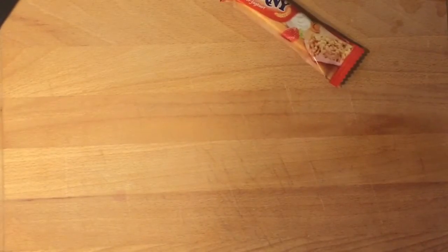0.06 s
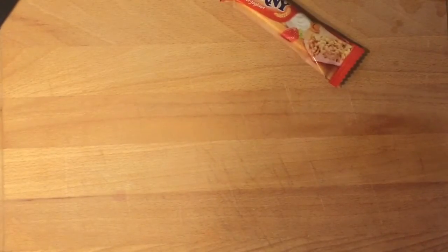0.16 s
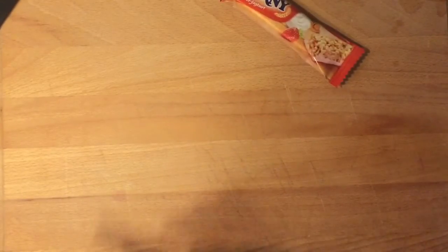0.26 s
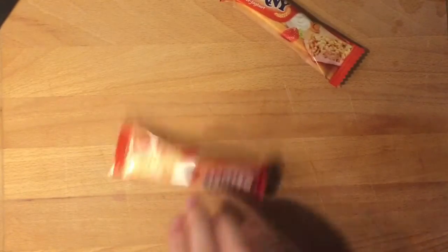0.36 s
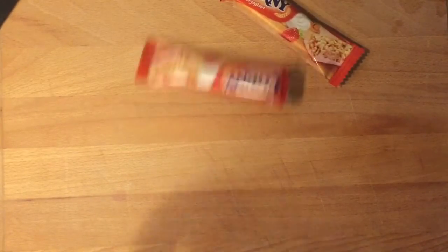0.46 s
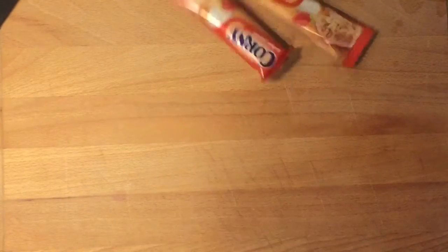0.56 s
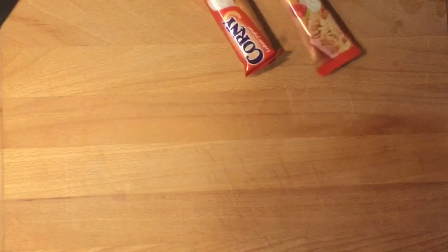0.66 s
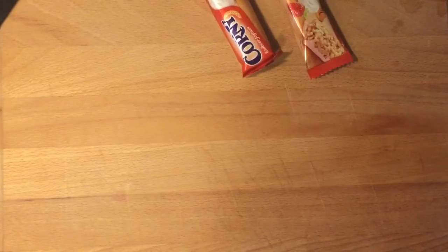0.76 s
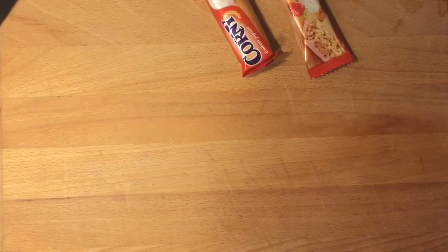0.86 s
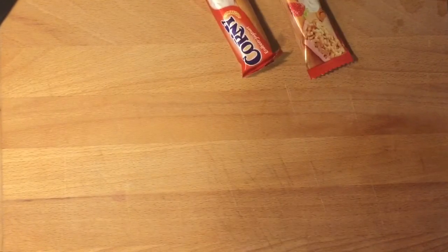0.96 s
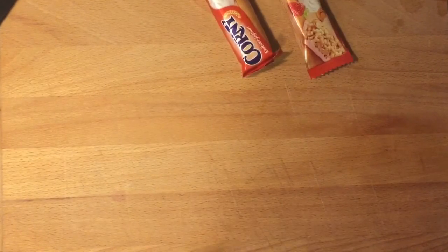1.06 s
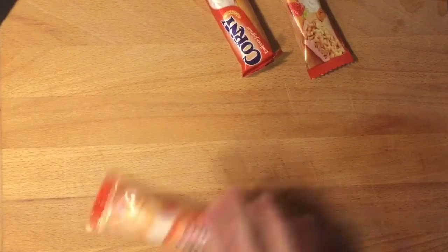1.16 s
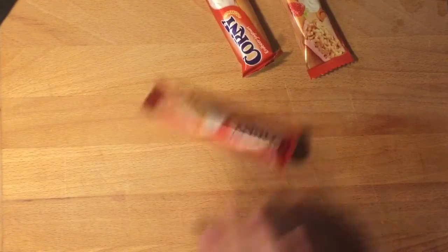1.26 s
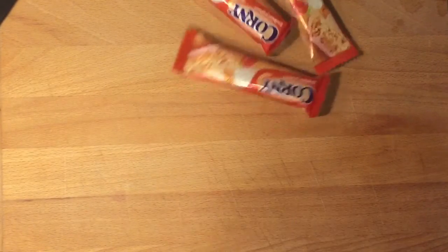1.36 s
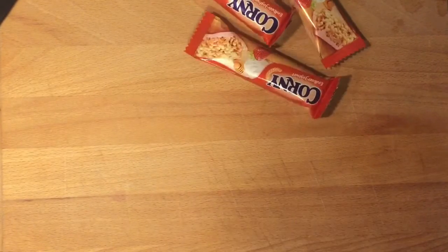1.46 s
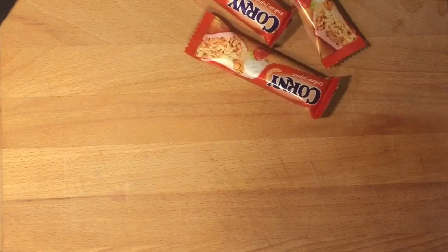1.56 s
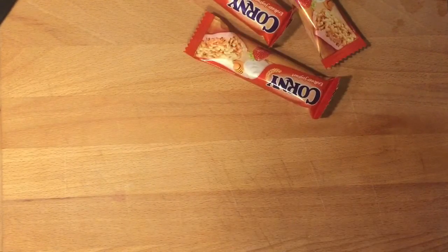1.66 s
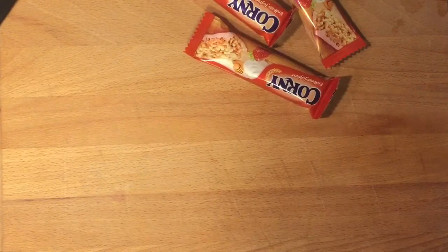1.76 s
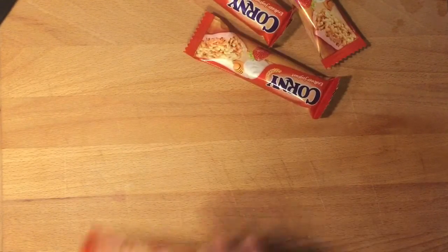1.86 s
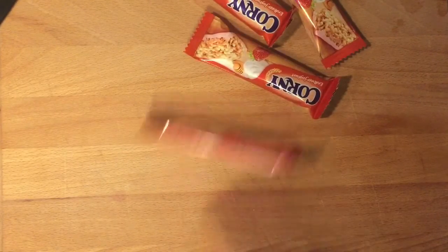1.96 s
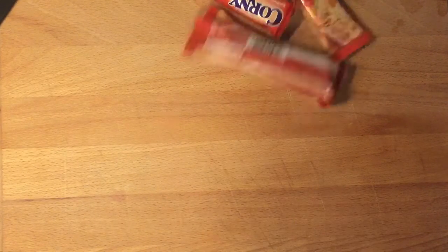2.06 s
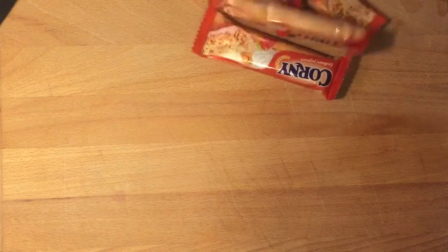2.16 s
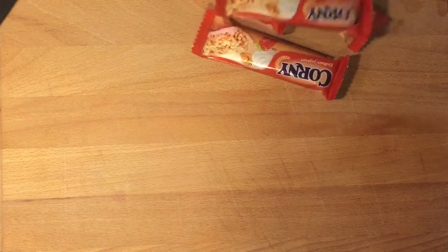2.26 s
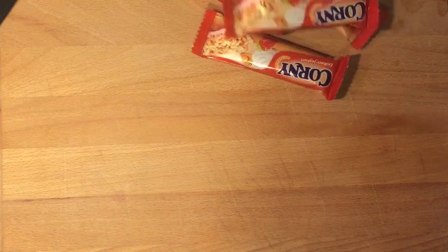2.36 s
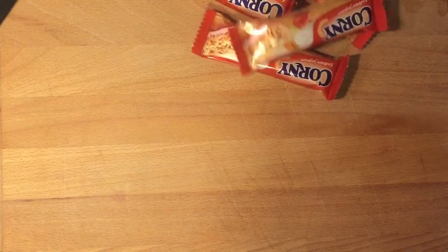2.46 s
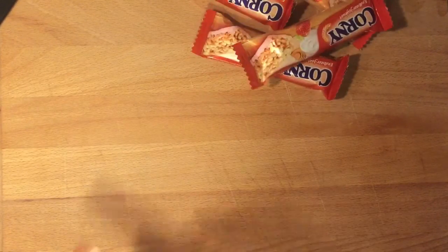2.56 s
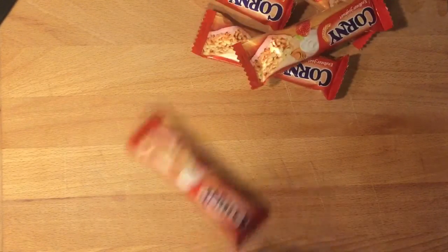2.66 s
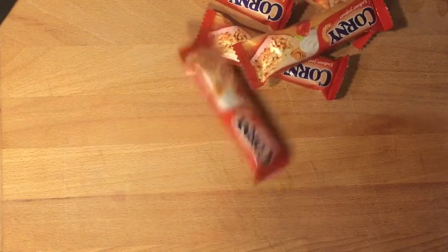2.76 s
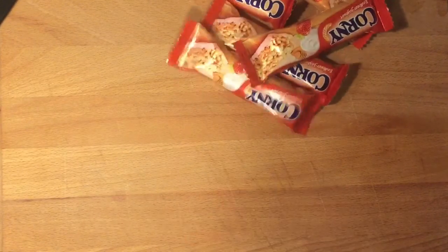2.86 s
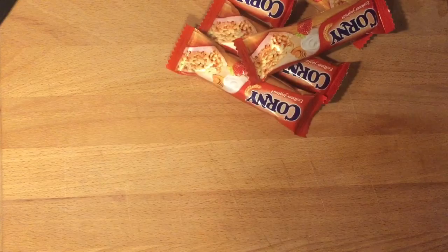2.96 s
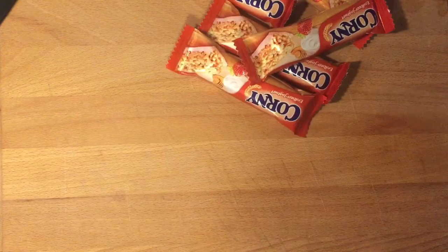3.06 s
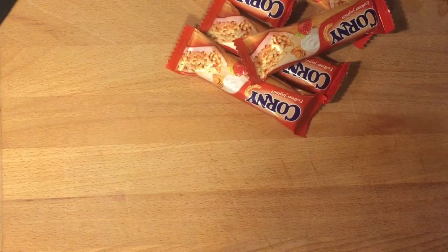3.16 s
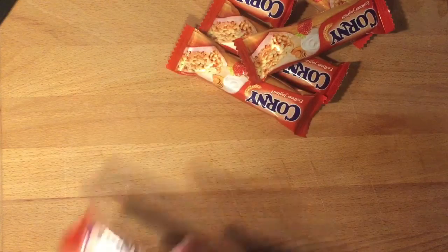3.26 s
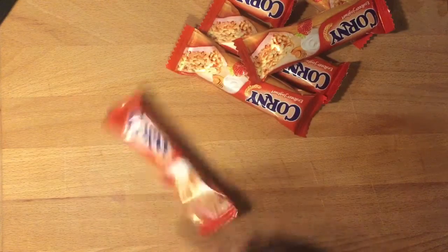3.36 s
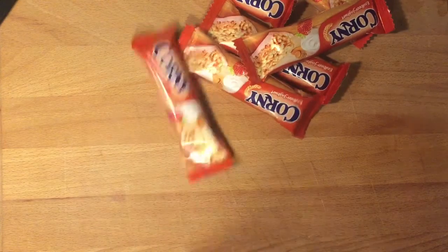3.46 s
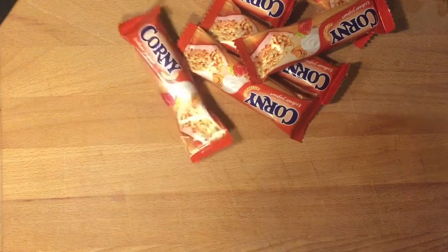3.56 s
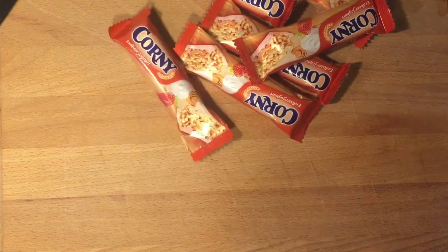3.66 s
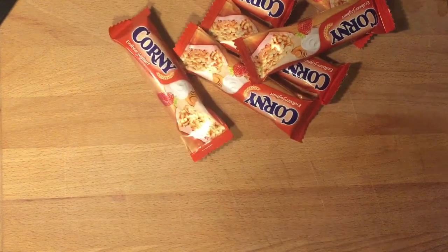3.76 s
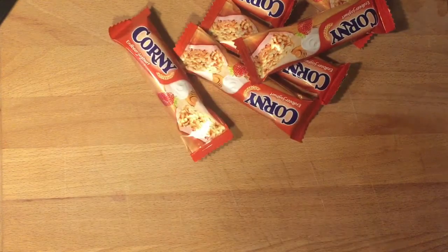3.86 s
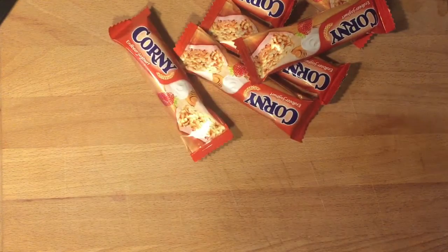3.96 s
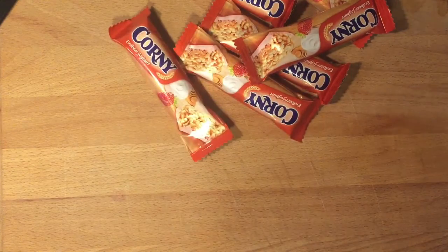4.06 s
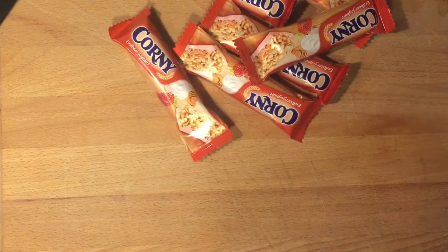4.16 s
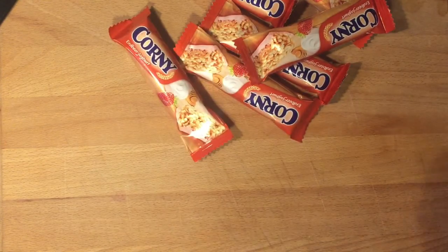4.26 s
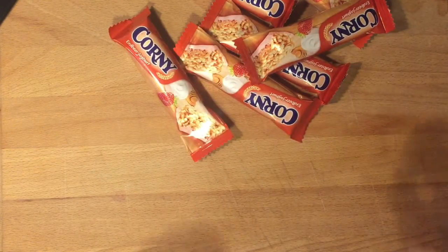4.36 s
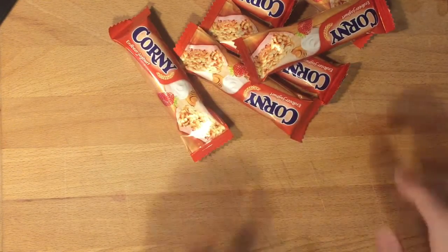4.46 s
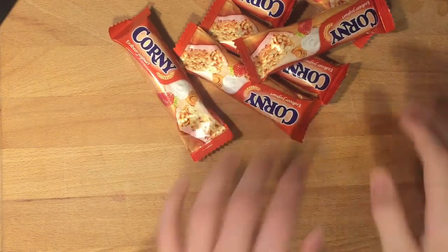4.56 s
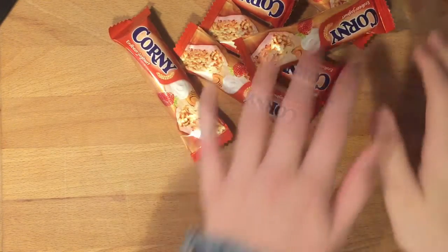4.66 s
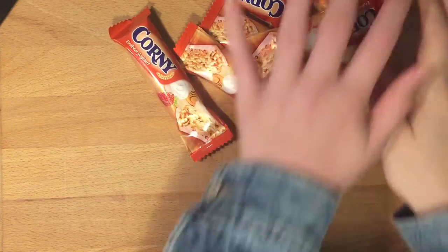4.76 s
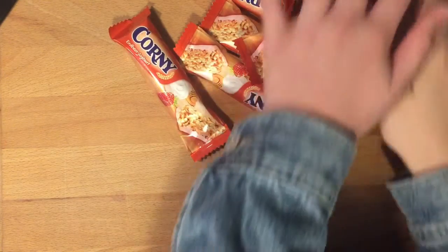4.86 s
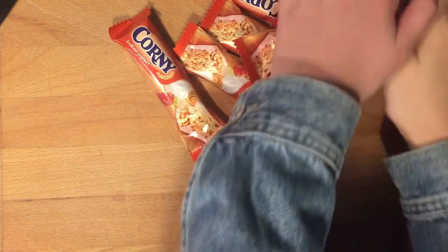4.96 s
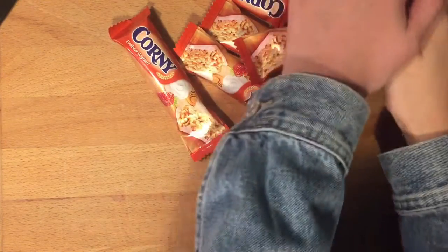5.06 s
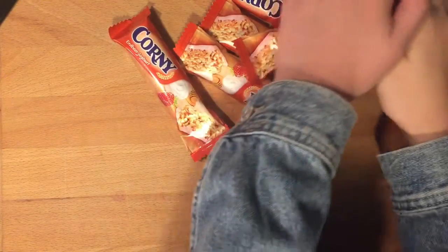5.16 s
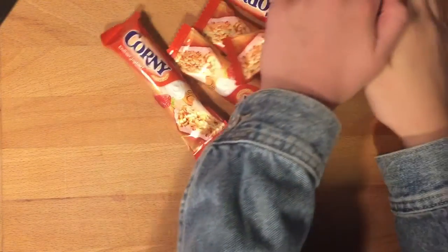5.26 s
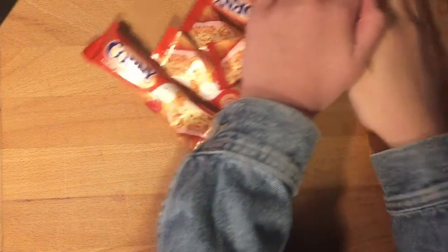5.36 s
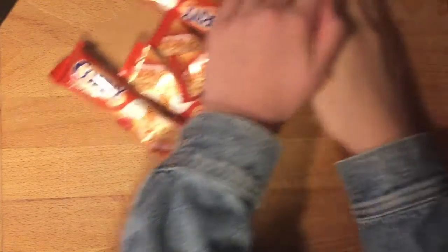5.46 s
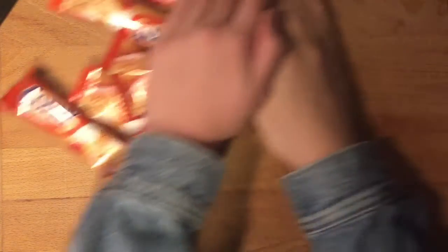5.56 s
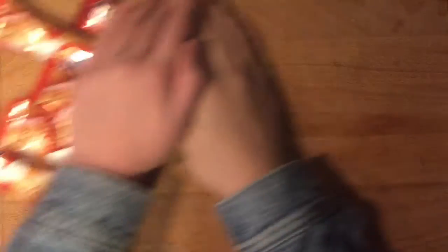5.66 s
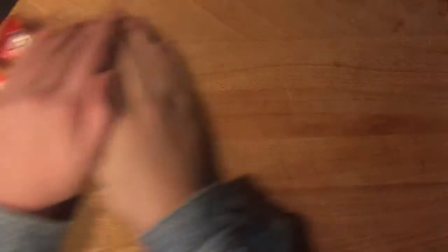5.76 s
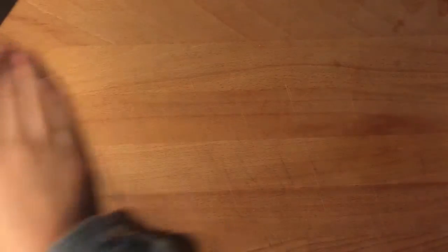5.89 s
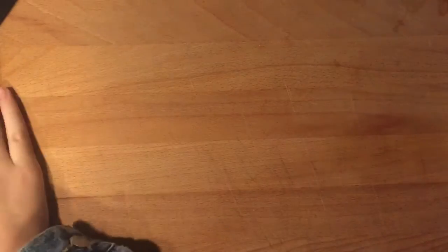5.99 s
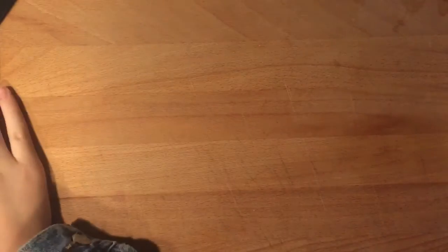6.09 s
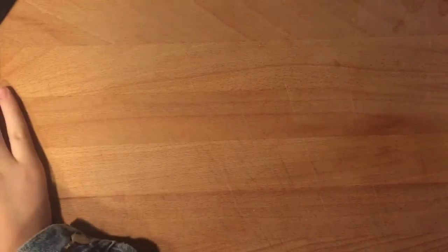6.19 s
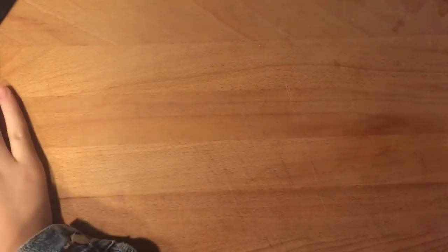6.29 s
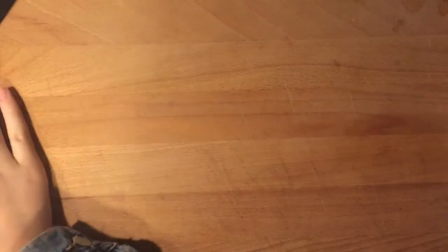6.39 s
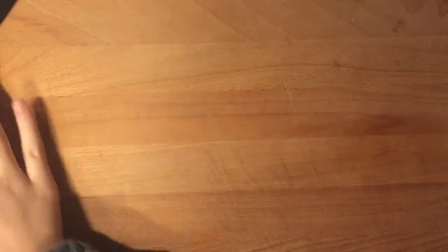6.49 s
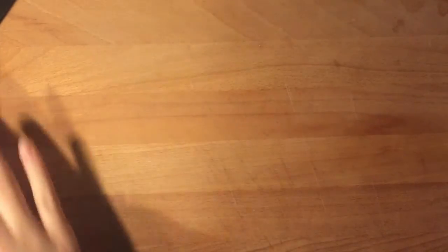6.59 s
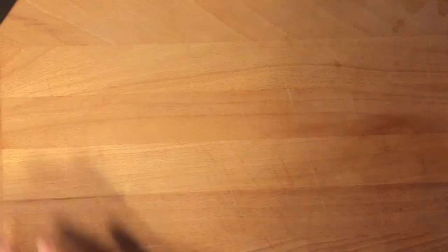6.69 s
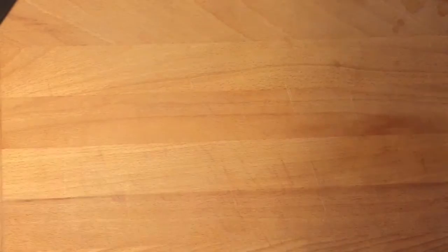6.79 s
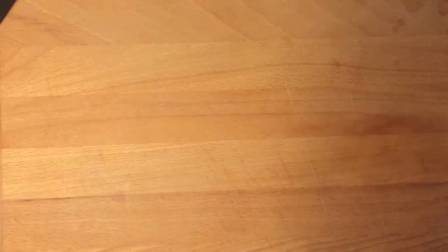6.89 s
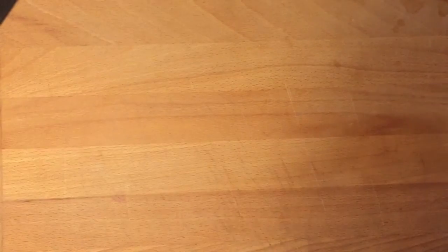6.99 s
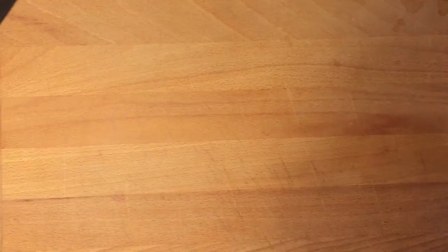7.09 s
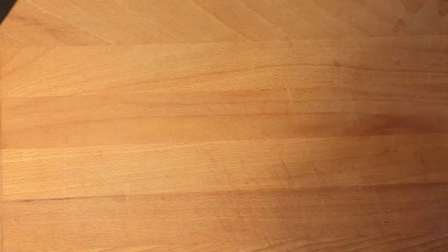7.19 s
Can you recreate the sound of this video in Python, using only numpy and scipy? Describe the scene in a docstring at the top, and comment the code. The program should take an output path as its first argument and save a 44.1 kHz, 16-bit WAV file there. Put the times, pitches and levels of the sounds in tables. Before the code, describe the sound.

Crinkly plastic wrappers smack onto wood five times, skidding briefly after each hit, before a longer crackling scrape clears them off.

```python
"""Wrapped bars on a wooden board

Five bars in plastic foil are tossed one by one onto a wooden board in a small room, close by.
Each slap is a burst of noise with a ringing board; skids and crinkles are crowds of tiny clicks.
Then two hands gather the pile and sweep it off, with soft cloth noise as the arms move.
Under it lie steady air noise and a low rumble that falls away after about three seconds."""
import sys
import numpy as np
from scipy import signal
from scipy.fft import rfft, irfft, next_fast_len
from scipy.io import wavfile
from scipy.ndimage import map_coordinates

SR = 44100
rng = np.random.default_rng(int(sys.argv[2]) if len(sys.argv) > 2 else 0)


def master_out(mix):
    """Clip the mix to full scale and print it as 16-bit PCM to the path in sys.argv[1]."""
    frames = np.transpose(np.atleast_2d(mix))
    ceiling = np.clip(frames, -1, 1)
    pcm = np.round(ceiling * 32767).astype(np.int16)
    wavfile.write(sys.argv[1], SR, pcm)


N = 318843  # length [samples]

# Bright crack of foil, as a spectrum: (frequency [Hz], relative level [dB per Hz])
CRACK_SPECTRUM = [(500, -29.5), (3000, 0), (4200, -5), (4850, -2.5), (5700, 3), (7600, -3.5), (9300, 0.5),
                  (10300, -8), (11400, -1.5), (12500, -8), (16000, -5)]
# Crinkling foil, as a spectrum: (frequency [Hz], relative level [dB per Hz])
CRINKLE_SPECTRUM = [(25,-59.5), (500,-17.5), (1100,-5), (1600,-3.5), (2100,0.5), (2900,0), (3500,-4),
                    (4200,-8), (4900,-11), (7000,-21.5), (16000,-31.5)]


def amp(db):
    """Turn decibels into gain."""
    return 10 ** (np.asarray(db) / 20)


def unit(x):
    """Scale a sound to rms 1."""
    return x / np.sqrt(np.mean(x ** 2) + 1e-20)


def pack(x):
    """Give a short sound the energy of a fiftieth of a second at rms 1."""
    return x / np.sqrt(np.sum(x ** 2) / (SR / 50) + 1e-20)


def along(points, hz):
    """Read a curve of (frequency [Hz], value) points on a log frequency axis."""
    point_hz, values = np.transpose(points)
    return np.interp(np.log(hz + 1), np.log(point_hz + 1), values)


def level(rows, axis=1):
    """Gain per sample from one dB column of a timed table, practically silent outside it."""
    columns = np.transpose(rows)
    db = np.interp(np.arange(N) / SR, columns[0], columns[axis], left=-120, right=-120)
    return amp(db)


def colour(x, spectrum, size=4096):
    """Filter a sound to the given spectrum without any sound before its start."""
    gain = amp(along(spectrum, np.fft.rfftfreq(size, 1 / SR)))
    # folding the cepstrum makes the filter minimum phase
    cepstrum = irfft(np.log(gain))
    cepstrum[1:size // 2] *= 2
    cepstrum[size // 2 + 1:] = 0
    response = irfft(np.exp(rfft(cepstrum)))
    return signal.fftconvolve(x, response)[:len(x)]


def noise(spectrum):
    """Steady coloured noise of rms 1."""
    return unit(colour(rng.standard_normal(N + SR), spectrum)[SR:])


def burst(spectrum, t60, spike, size=4096):
    """A first sharp contact and a flurry of tiny ones that dies by 60 dB in t60 seconds, coloured."""
    flurry = rng.standard_normal(size) * amp(-60 * np.arange(size) / SR / t60)
    flurry /= np.linalg.norm(flurry)
    flurry[0] += spike
    return pack(colour(flurry, spectrum))


def grains(spectrum, per_second, spread_db):
    """Random tiny clicks of uneven size; their power stays even when their rate changes."""
    spread = np.clip(rng.standard_normal(N), -2, 1.5)
    sizes = amp(spread_db * spread) * rng.choice([-1, 1], N)
    clicking = rng.random(N) < per_second / SR
    return unit(colour(sizes / np.sqrt(per_second) * clicking, spectrum))


def wobble(rate):
    """A smooth random curve with rate knots a second."""
    knots = np.arange(N) / SR * rate
    return map_coordinates(rng.standard_normal(int(knots[-1]) + 4), [knots])


def swell(s, rise_s, fall_s):
    """A smooth gain that peaks at 1 at time s."""
    t = np.arange(N) / SR - s
    return np.exp(-(t / np.where(t < 0, rise_s, fall_s)) ** 2)


def add(track, s, sound):
    """Mix a sound in at time s."""
    part = track[max(round(s * SR), 0):][:len(sound)]
    part += sound[:len(part)]


def background():
    """Steady noise for the room's air, and low noise that follows a fading level for the rumble."""
    # spectra: (frequency [Hz], relative level [dB per Hz])
    air_spectrum = [(25,-22), (55,-11), (113,-4.5), (140,-7.5), (300,-14), (980,-15.5), (1300,-17),
                    (3200,-20.5), (5000,-25.5), (16000,-35.5)]
    drone_spectrum = [(25, -30), (45, -12), (62, 4), (95, 2.5), (125, -12.5), (200, -41), (500, -68)]
    # fading of the rumble, before its overall gain: (time [s], level [dB])
    rumble_fade = [(0,-52.5), (1.3,-56.5), (2.9,-59), (3.3,-65), (4.2,-70), (7.23,-81.5)]
    air = amp(-63.5) * noise(air_spectrum)
    rumble = amp(2.5) * level(rumble_fade) * noise(drone_spectrum)
    return air + rumble


def motion():
    """How hard the foil is flexed and how fast it skids: each bar is thrown, skids and relaxes,
    fingers grip and let go, then all bars are swept off."""
    # tossed bars; levels are relative, before the mix in wrappers():
    # (landing time [s], crinkle level leaving the hand [dB], delay to the fastest skid [s],
    #  skid level [dB], crinkle level in the skid [dB], crinkle level while relaxing [dB],
    #  time from landing to rest [s])
    tosses = [(0.369, -52, 0.13, -33.5, -41, -33, .37), (1.210, -48, 0.11, -31.5, -26, -35.5, .38),
              (1.943, -43, .084, -27.5, -15, -32, .39), (2.701, -56, .140, -40, -39, -40, .22),
              (3.377, -62, 0.093, -42.5, -31, -41.5, .28)]
    # fingers take hold of a wrapper or let it go:
    # (time [s], relative crinkle level [dB], half length [s])
    grips = [(0.01,-43,0.048), (0.956,-59,0.062), (1.16,-46.5,0.024), (1.738,-49,0.041), (2.49,-46.5,0.074),
             (3.041,-49.5,.015), (6.33,-55.5,0.018), (6.432,-43.5,0.077), (6.578,-54,0.11)]
    # hands gather the pile and push it off the board, before the trims below:
    # (time [s], crinkle level [dB], skid level [dB])
    sweep = [(5.15, -77, -80.5), (5.164, -49, -67.5), (5.21, -41.5, -48), (5.342, -43.5, -44.5),
             (5.562, -37, -30.5), (5.774, -35, -34.5), (5.948, -23, -36), (6.204, -58, -69.5),
             (6.25, -84, -85.5)]
    throw_db_per_s = 151  # build-up of the crinkle in the hand before landing
    relax_db_per_s, rest_db_per_s = 27, 219  # calming after landing, and extra once at rest
    skid_rise_s, skid_fall_s = 0.031, 0.03
    grip_slip_db = -12.5  # foil sliding along with crinkling in the hand or at rest
    sweep_crinkle_db, sweep_skid_db = -2, -1

    flex, skid, gentle = np.zeros((3, N))
    for s, throw_db, delay_s, skid_db, crush_db, relax_db, rest_s in tosses:
        t = np.arange(N) / SR - s
        throwing_db = throw_db + throw_db_per_s * t
        relaxing_db = relax_db - relax_db_per_s * t - rest_db_per_s * np.maximum(t - rest_s, 0)
        gentle += amp(np.where(t < 0, throwing_db, relaxing_db))
        slide = swell(s + delay_s, skid_rise_s, skid_fall_s)
        flex += amp(crush_db) * slide
        skid += amp(skid_db) * slide
    for s, db, half_s in grips:
        gentle += amp(db) * swell(s, half_s, half_s)
    flex += gentle + amp(sweep_crinkle_db) * level(sweep, axis=1)
    skid += amp(grip_slip_db) * gentle + amp(sweep_skid_db) * level(sweep, axis=2)
    return flex, skid


def foil(facet_hz):
    """The wrapper's spectrum with the resonance of one facet (a small flat patch) standing out."""
    return [(hz, db + 12 * np.exp(-(np.log(hz / facet_hz) / .2) ** 2)) for hz, db in CRINKLE_SPECTRUM]


def crinkle(flex):
    """Foil facets of several sizes click, more often the harder the foil is flexed."""
    per_second = 35 + 70 * (flex / amp(-40)) ** 1.1
    out = np.zeros(N)
    for facet_hz in (1420, 1860, 2800, 3530):
        # facets of one size give way in clumps, so the colour keeps shifting
        clumps = amp(3.5 * wobble(45))
        clicks = grains(foil(facet_hz), per_second, spread_db=0)
        out += amp(along(CRINKLE_SPECTRUM, facet_hz)) * clumps * clicks
    # the smallest creases fizz in the treble
    fizz = unit(amp(4 * wobble(60)) * grains(CRACK_SPECTRUM, 10 * per_second, spread_db=5))
    return flex * (unit(out) + amp(-12.5) * fizz)


def creases():
    """Small creases tick at uneven intervals, each with a bright crack."""
    creases_per_s, crack_db = 28, -9.5  # average rate, and crack level against the tick
    times = np.cumsum(rng.uniform(.2, 1.8, 1000)) / creases_per_s
    sizes = amp(3 * np.clip(rng.standard_normal(len(times)), -2, 1.5))
    out = np.zeros(N)
    for s, size in zip(times[times < N / SR], sizes):
        tick = burst(CRINKLE_SPECTRUM, t60=0.014, spike=.4, size=1024)
        crack = burst(CRACK_SPECTRUM, t60=0.015, spike=.4, size=1024)
        add(out, s, size * (tick + amp(crack_db) * crack))
    return unit(out)


def wrappers():
    """Flexing foil crinkles in sparse grains; foil skidding on wood hisses in dense ones."""
    # hiss of foil on wood: (frequency [Hz], relative level [dB per Hz])
    skid_spectrum = [(25,-40.5), (100,-3.5), (140,-15.5), (200,-6), (450,-14.5), (700,-15), (1000,4),
                     (1400,-11.5), (3100,10), (4800,-5), (6000,6.5), (7700,-1.5), (9300,3.5), (10300,-3),
                     (11400,1), (16000,-5.5)]
    flex, skid = motion()
    # the foil catches and lets go, and faster skids meet more ridges of the wood
    catching = amp(1.1 * wobble(50))
    ridges_per_s = 1500 + 5000 * skid / amp(-35.0)
    hiss = amp(1.0) * skid * catching * grains(skid_spectrum, ridges_per_s, spread_db=2.5)
    # a single crease can only snap so loudly
    ticks = amp(-6.5) * np.minimum(flex, amp(-35.5)) * creases()
    return amp(-4) * crinkle(flex) + ticks + hiss


def snaps():
    """A large crease snaps over: a facet of foil swings for a few cycles and shakes the wrapper."""
    # snapping creases, with levels before the trims below:
    # (time [s], snap level [dB], pitch [Hz], crack level [dB])
    snap_times = [(0.236,-28.5,3260,-61), (0.294,-21,3400,-36), (0.336,-4.5,3400,-25.5),
                  (0.53,-9,2870,-35.5), (0.5414,-2,3330,-19.5), (0.7216,-8.5,3420,-33),
                  (0.863,-35.5,3700,-51.5), (1.028,-26,3340,-46.5), (1.091,-30,2870,-50),
                  (1.161,-6.5,2750,-33.5), (1.290,-3,3110,-22), (1.394,-9,2520,-24.5),
                  (1.542,-22.5,3200,-38.5), (1.598,-30.5,2550,-59), (1.7428,-13.5,3150,-32.5),
                  (1.899,-24.5,2980,-40), (2.036,-6,2950,-29), (2.046,-1,3170,-22), (2.215,-20,3040,-40),
                  (2.283,-19.5,2590,-38.5), (2.394,-16,2340,-34), (2.5826,-14.5,3700,-30),
                  (2.609,-21.5,3050,-42), (2.6789,-14.5,3300,-32), (2.935,-22,2300,-48),
                  (2.961,-31,2510,-44.5), (3.008,-30.5,3190,-57), (3.1733,-23,2960,-65),
                  (3.243,-21,2800,-63), (3.253,-21,2390,-47), (3.363,-22,3050,-30), (3.481,-12.5,2900,-43),
                  (3.714,-37.5,2870,-51), (3.783,-40.5,3250,-51), (5.195,-31,3200,-46.5),
                  (5.214,-19.5,3280,-33.5), (5.23,-18.5,3180,-36), (5.276,-14,3200,-35.5),
                  (5.332,-20.5,1920,-52), (5.704,-17,1970,-47), (5.878,-8,2800,-40), (5.93,-10.5,2200,-31),
                  (5.943,-8,2770,-29), (5.963,-6,2700,-34), (6.021,-18,1610,-30), (6.183,-39,2750,-51),
                  (6.264,-37,2700,-51), (6.371,-37,3230,-33), (6.390,-26,2780,-46), (6.414,-24.5,2580,-53),
                  (6.429,-22.5,2750,-50)]
    out, t = np.zeros(N), np.arange(SR // 20) / SR
    for s, db, hz, crack_db in snap_times:
        fade_in = 1 - np.exp(-t / .0004)
        facet = np.sin(2 * np.pi * hz * t) * amp(-60 * t / .005) * fade_in
        shake = burst(foil(hz), t60=.035, spike=.2, size=len(t))
        add(out, s, amp(db - 22.5) * (pack(facet) + shake))
        add(out, s, amp(crack_db - 7.0) * burst(CRACK_SPECTRUM, t60=.022, spike=0.27))
    return out


def blows():
    """The foil slaps and cracks while the bar inside knocks the board into ringing."""
    # bars striking the board, with levels before the trims below:
    # (time [s], slap level [dB], wood level [dB], crack level [dB])
    strikes = [(0.333,-8,-35,-29), (0.369,2.5,-18.5,-21), (0.378,-4.5,-19,-27), (0.577,-14,-37.5,-33),
               (1.210,1.5,-20,-23), (1.222,0,-15,-29), (1.227,-7.5,-23,-24), (1.93,-7.5,-22.5,-34.5),
               (1.943,2.5,-15,-25), (2.067,-9,-27,-28), (2.169,-15.5,-42.5,-37.5), (2.690,-5,-17.5,-27),
               (2.701,4,-19,-23), (2.706,-7,-15,-33), (2.829,-6,-22.5,-32), (2.899,-14.5,-30.5,-39),
               (3.368,-7.5,-27,-24.5), (3.377,6,-11,-20.5), (3.381,-7.5,-23.5,-26.5),
               (3.576,-18.5,-36.5,-40), (5.846,-6.5,-32.5,-21.5), (5.889,-5,-27,-18), (5.953,-19,-19,-23),
               (6.482,-19.5,-56,-39)]
    # ringing tones of the board: (frequency [Hz], relative level [dB], time to fall 60 dB [s])
    board_modes = [(107,-21,0.2), (168,-23.5,0.073), (218,-14.5,0.12), (355.2,-13,0.074), (565.5,-12,0.13),
                   (867,-2.5,0.065), (983,-9.5,0.032), (1109,-6,0.066), (1455,-5.5,0.055)]
    # spectra: (frequency [Hz], relative level [dB per Hz])
    knock_spectrum = [(25,-42.5), (60,-23), (200,-10), (480,-20), (570,-3.5), (740,-5), (830,-4), (960,1),
                      (1150,-4.5), (1600,-5), (2500,-26), (6000,-58.5)]
    slap_spectrum = [(25,-40), (600,-14), (900,-6), (1400,-7), (2000,-1), (2700,3), (3400,1), (4100,-10.5),
                     (4900,-18), (8000,-32.5), (16000,-49.5)]
    out, t = np.zeros(N), np.arange(SR // 2) / SR
    hz, db, t60 = np.transpose(board_modes)[:, :, None]
    for s, slap_db, wood_db, crack_db in strikes:
        # the strengths of the board's tones vary at random from strike to strike
        strength = amp(db + rng.normal(0, 2, hz.shape)) * rng.choice([-1, 1], hz.shape)
        ring = np.sum(strength * np.sin(2 * np.pi * hz * t) * amp(-60 * t / t60), axis=0)
        # a harder blow moves the knock out of the bass
        hardness_db = .5 * max(wood_db + 19, 0)
        knock = [(f, gain_db + hardness_db * (f > 780)) for f, gain_db in knock_spectrum]
        add(out, s, amp(wood_db - 10.5) * pack(ring))
        add(out, s, amp(wood_db - 6.5) * burst(knock, t60=0.011, spike=0.67))
        add(out, s, amp(slap_db - 19.5) * burst(slap_spectrum, t60=.024, spike=.5))
        add(out, s, amp(crack_db - 7.5) * burst(CRACK_SPECTRUM, t60=0.05, spike=.2))
    return out


def bumps():
    """Hands and pile bump the board: padded contacts give a dull thud around one pitch."""
    # thuds: (time [s], level [dB], pitch [Hz], time to fall 60 dB [s])
    thuds = [(3.655,-50.5,166,0.14), (4.73,-46.5,42.4,0.19), (5.845,-33,100,0.46), (5.89,-44,110,0.39),
             (5.949,-47,104,0.33), (6.426,-42,130,0.13), (6.455,-42,65,0.14), (6.468,-41.5,1140,0.063),
             (6.479,-30.5,1220,0.045), (6.76,-56,199,0.25)]
    out, t = np.zeros(N), np.arange(SR // 2) / SR
    for s, db, hz, t60 in thuds:
        dull = [(hz / 3, -28), (hz, 0), (hz * 2, -10), (hz * 12, -45)]
        fading = rng.standard_normal(len(t)) * amp(-60 * t / t60)
        add(out, s, amp(db) * pack(colour(fading, dull)))
    return out


def sleeves():
    """A sleeve brushes along: cloth hisses softly while an arm moves."""
    # arm movements: (time [s], level [dB], rise [s], fall [s])
    arm_moves = [(4.82,-56.5,0.26,0.19), (6.79,-61,0.085,0.41)]
    # hiss of cloth: (frequency [Hz], relative level [dB per Hz])
    cloth_spectrum = [(100,-28), (400,-5), (1000,-4), (1600,-4.5), (3100,-1), (4600,-11.5), (16000,-21)]
    moving = sum(amp(db) * swell(s, rise_s, fall_s) for s, db, rise_s, fall_s in arm_moves)
    return moving * noise(cloth_spectrum)


def room(x, parts=14):
    """A short diffuse tail of fading noise, drawn afresh for each of several equal stretches of time."""
    # echo fading: (frequency [Hz], time to fall 60 dB [s])
    echo_times = [(100,0.79), (300,0.43), (900,0.4), (2500,0.32), (6000,0.32), (15000,0.36)]
    out = np.zeros(N)
    for part in np.array_split(np.arange(N), parts):
        hz, t, z = signal.stft(rng.standard_normal(SR // 2), SR, nperseg=256)
        fade = amp(-60 * t / along(echo_times, hz)[:, None])
        tail = signal.istft(z * fade, SR, nperseg=256)[1]
        echo = signal.fftconvolve(x[part], tail / np.linalg.norm(tail))
        add(out, part[0] / SR + .003, echo)  # the echo starts 3 ms late
    return out


def scene(walls=3):
    """Everything on the board, its room and the background."""
    blows_wet_db, snaps_wet_db, rustle_wet_db = -8, -9, -8  # how strongly the room answers
    rustle = wrappers()
    direct = rustle + snaps() + blows() + bumps() + sleeves()
    # crumpled foil sends a different waveform to every wall, so the echoes blur together
    echoes = np.zeros(N)
    for _ in range(walls):
        hits = amp(blows_wet_db) * (blows() + bumps())
        echoes += room(hits + amp(snaps_wet_db) * snaps())
    wet = echoes / np.sqrt(walls) + amp(rustle_wet_db) * room(rustle)
    return (direct + wet + background())[None]


def record(dry):
    """Peaks are softly limited near full scale; deepest bass and all above about 16 kHz are filtered out."""
    top_hz = 15900
    limited = dry / (1 + np.abs(dry) ** 6) ** (1 / 6)
    bass_cut = signal.butter(2, 32, "high", fs=SR, output="sos")
    thinned = signal.sosfilt(bass_cut, limited)
    size = next_fast_len(N + SR // 2)
    low_pass = 1 / (1 + (np.fft.rfftfreq(size, 1 / SR) / top_hz) ** 200)
    return irfft(rfft(thinned, size) * low_pass, size)[..., :N]


dry = scene()
out = record(dry)
master_out(out)
```